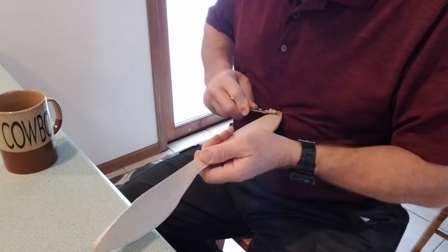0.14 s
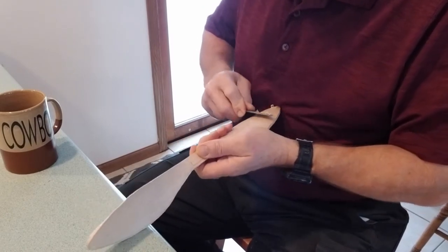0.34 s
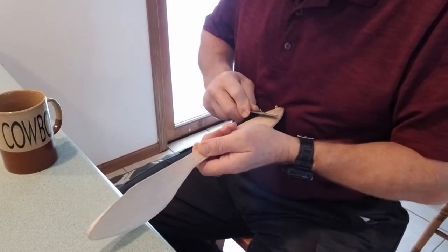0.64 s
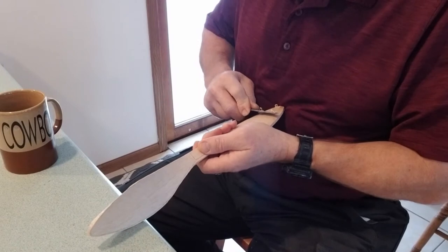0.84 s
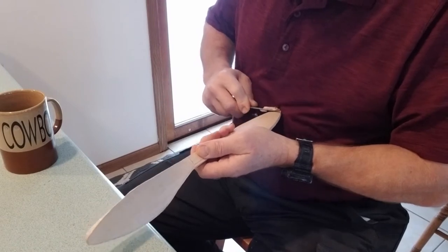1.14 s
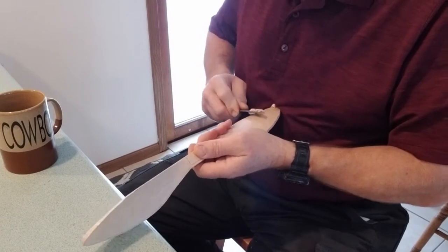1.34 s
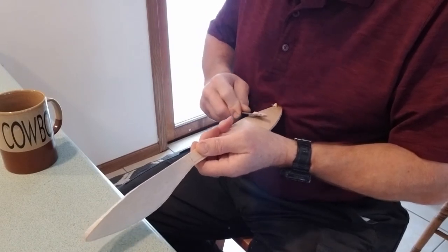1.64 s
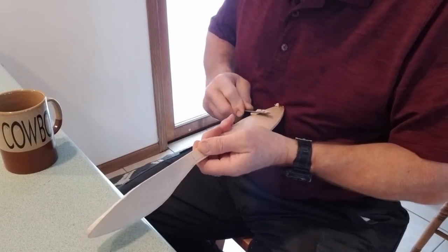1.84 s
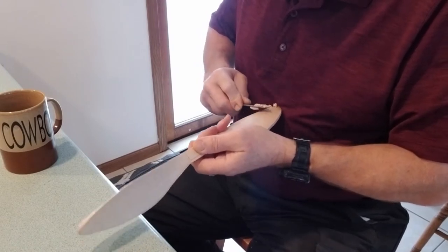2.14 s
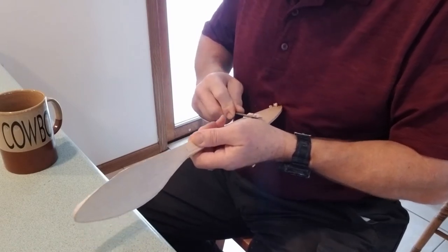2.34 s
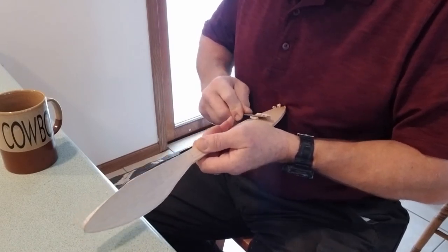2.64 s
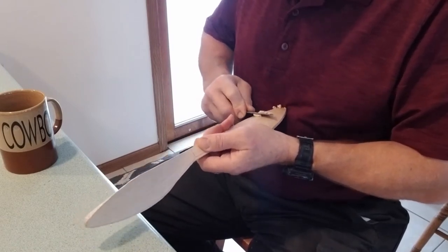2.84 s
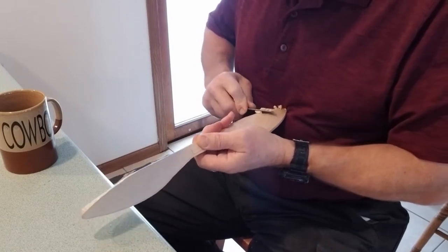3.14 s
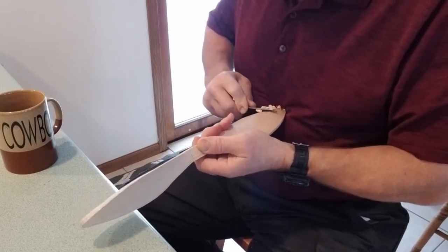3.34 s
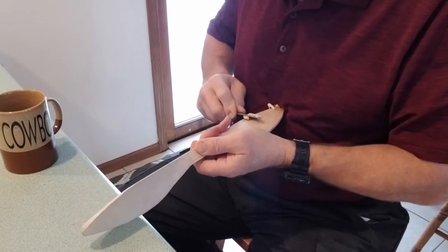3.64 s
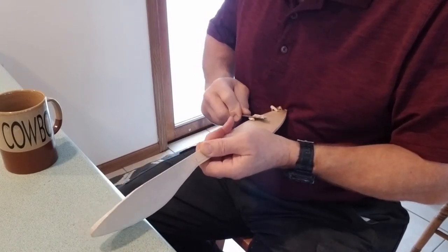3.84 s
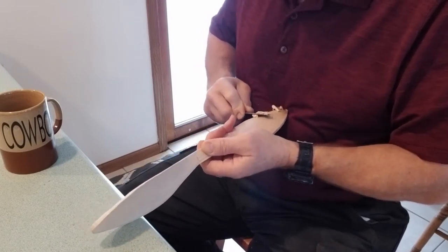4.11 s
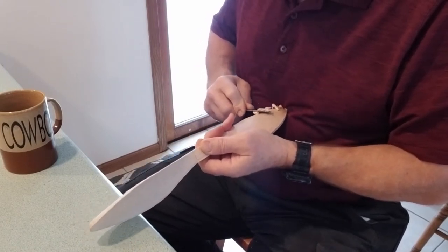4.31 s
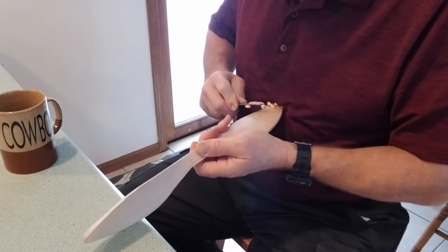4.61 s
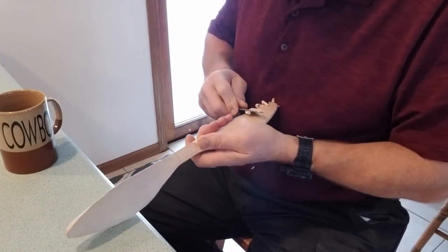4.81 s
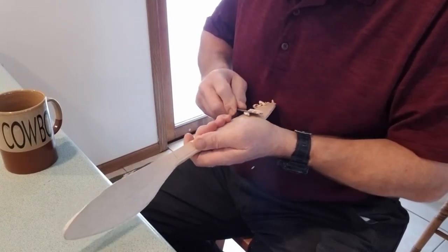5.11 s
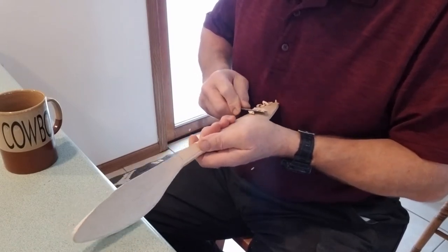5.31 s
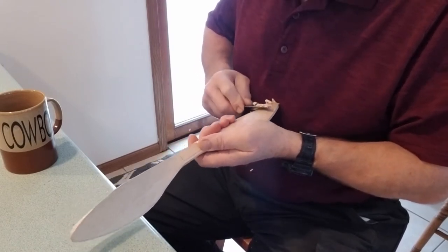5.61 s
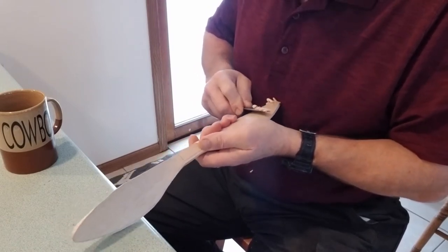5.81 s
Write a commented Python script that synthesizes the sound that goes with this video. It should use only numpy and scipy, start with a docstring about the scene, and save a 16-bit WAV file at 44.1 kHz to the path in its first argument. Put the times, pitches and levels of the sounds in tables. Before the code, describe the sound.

Close up, a knife makes short, dry, raspy cuts in a thin wooden blade, several per second with small gaps. The edge catches and fine fibres snap. The wood's far tip taps the table with hollow, quickly damped knocks, some with a soft low thud. A small hard kitchen adds brief reflections; hush is very faint. The left microphone is brighter and nearer, the right duller and more distant.

```python
"""A small knife shaves a light wooden blade in quick strokes: torn fibres ring the wood, edge and shaving.
The edge slips now and then, and single fibres snap.
The far tip of the blade knocks on the table top: a contact tick, damped modes, a deep ring and a thud.
A hard-walled kitchen answers with early echoes and a diffuse tail, built from sparse random taps.
Behind it lie a quiet hush and a low sway, both shaped noise; the right side is duller and more distant."""
import sys
import numpy as np
from scipy import signal
from scipy.fft import rfft, irfft
from scipy.io import wavfile
from scipy.ndimage import uniform_filter1d

SR = 44100
rng = np.random.default_rng(int(sys.argv[2]) if len(sys.argv) > 2 else 0)


def transcribe(u):
    """Save the signal u as a 16-bit wav file named by the first command-line argument.

    u: samples, shape (n,) or (channels, n), limited to [-1, 1]; the rate is SR.
    q: integer samples, one column per channel.
    """
    v = np.clip(np.atleast_2d(u).T, -1, 1)
    q = np.round(v * 32767).astype(np.int16)
    wavfile.write(sys.argv[1], SR, q)


N = 262836

# All levels are set ahead of the mix; a rel_db is relative to the layer or level that it belongs to.
# One row per cut: start_s, rise_s, hold_s, press_db (edge pressure), bite_rel_db (into the wood),
# fizz_rel_db (curling shaving), rasp_db (wood resonance), wood_hz, edge_hz (resonances)
STROKES = [(0.0, 0.0013, .08, -44, 5.5, -4, 8.5, 1860, 5600),
           (0.15, .02, 0.12, -55, -18, -3.5, 14, 1500, 5370),
           (0.269, 0.012, 0.047, -53.5, 5, 4, -3, 1300, 5270),
           (0.367, 0.035, 0.028, -58, -3, 1, 21, 1300, 6300),
           (0.502, 0.11, 0.014, -51.5, -12, -12.5, 18.5, 1900, 5650),
           (0.712, 0.028, 0.18, -52.5, -4.5, -5, -16, 1680, 5830),
           (0.896, 0.063, 0.068, -47, -12, -7.5, 15.5, 2030, 5230),
           (0.968, 0.069, 0.035, -44.5, 5, -3.5, 13.5, 1780, 5460),
           (1.041, 0.053, 0.057, -50, -18, 0, 11, 1970, 5030),
           (1.346, 0.018, 0.01, -65.5, -2, 15, 30, 1300, 6700),
           (1.379, 0.053, 0.088, -53.5, -5, -2, 7, 1350, 6850),
           (1.665, 0.042, 0.1, -44.5, -2.5, -8, 9.5, 1860, 5260),
           (1.858, .1, 0.04, -41.5, -1, -6, 12, 1710, 5300),
           (2.251, 0.008, 0.01, -59.5, 12, -9, 13, 1340, 5100),
           (2.506, 0.058, 0.076, -55.5, -17, -10, 13, 1600, 4630),
           (2.619, 0.015, 0.028, -51, -3, -7, 17.5, 1600, 4300),
           (2.679, 0.046, 0.048, -48.5, -3, -8, 17.5, 1750, 4070),
           (2.791, 0.032, 0.068, -50.5, -6, -6, 11, 1850, 6360),
           (2.873, 0.088, 0.11, -43, -10.5, -9, 22.5, 1924, 6700),
           (3.183, 0.09, 0.051, -43, 4, -2.5, -13, 1400, 5870),
           (3.453, 0.035, 0.1, -55.5, -15, 0, 13, 1330, 6700),
           (3.658, 0.011, 0.0076, -56.5, -30, 6, 5, 1580, 6760),
           (3.693, 0.082, .03, -51, -5.5, -4.5, 17, 1720, 5300),
           (3.795, 0.014, 0.14, -42.5, 3, -7.5, 6, 1500, 5560),
           (4.04, 0.1, 0.013, -46, -1, -8, 6, 1870, 5250),
           (4.216, 0.066, 0.065, -39.5, 1.5, -5.5, -32, 1340, 5560),
           (4.591, 0.035, 0.051, -43.5, -13, -3, 2, 1720, 5470),
           (4.713, 0.037, 0.023, -50, 6.5, -1, -11, 1260, 6430),
           (4.803, 0.072, 0.074, -52, -15.5, -3, 14, 1330, 6760),
           (5.116, 0.011, 0.24, -57.5, -13, -1.5, 8, 1700, 5350),
           (5.253, 0.056, 0.066, -45, 6.5, -2.5, 8.5, 1900, 5800),
           (5.489, 0.081, 0.032, -53.5, 3.5, 3.5, -31, 1700, 5730),
           (5.546, 0.03, 0.0084, -73.5, -3, 25, 11, 1710, 6100),
           (5.7, 0.023, 0.13, -62, -3, 0.5, 17, 1300, 6100),
           (5.773, 0.14, .1, -50.5, -2.5, -1.5, 14.5, 1730, 5800)]
RISE_DB, SAG_DB_PER_S, LIFT_DB_PER_S = 20, 19.5, 218  # a cut climbs, sags while held, dies as the edge lifts
# The edge catches and drags free: start_s, level_db, swell_ms
SLIPS = [(0.6207, -49, 4.2), (0.9838, -41.5, 4.1), (1.0632, -37.5, 1.7), (1.6934, -43.5, 6),
         (1.788, -42, 3.7), (1.8342, -40.5, 5.4), (1.8937, -43, 6.9), (1.9235, -39.5, 2.8),
         (2.477, -60, 1.8), (3.2078, -39.5, 2.4), (3.2333, -39, 5.1), (4.0816, -44, 9.4), (4.115, -39, 4.7),
         (4.143, -33.5, 3.1), (4.24, -34, 2.7), (4.2752, -40.5, 1.3), (4.295, -37, 2.4), (4.616, -52, 3),
         (4.746, -49, 3.3), (4.9365, -40.5, 2.1), (5.1153, -59, 3.9), (5.2809, -46, 1.8), (5.306, -54, 6),
         (5.335, -53, 4), (5.361, -46, 3.6), (5.5358, -54, 8.6)]
SLIP_BITE_DB, SLIP_FIZZ_DB = -8.5, -2.5  # relative to the bite and fizz of the stroke at that moment
# A single fibre snaps: start_s, level_db, fizz_rel_db, bite_rel_db
SNAPS = [(0.2867, -35, -14, 6), (0.946, -33, 0, -35), (2.9556, -41, -23.5, -10), (3.2607, -34.5, 6, 1),
         (5.3521, -26, 3.5, -2.5), (5.603, -52, 27, -10)]
# Spectrum of torn fibres: freq_hz, rel_db (per Hz)
TEAR_SPECTRUM = [(88, -29), (150, 4), (235, -7), (361, -0.5), (1020, -6.5), (1310, 4), (1720, 0),
                 (2310, -1.5), (2980, 0.5), (3770, -1.5), (6770, -1.5), (8900, -25.5), (13700, -19),
                 (16000, -34.5)]
# Ring of knife and wood: freq_hz, width_hz, rel_db
BODY_RINGS = [(2800, 54, -1), (4430, 540, -3.5), (5036, 250, 2), (6930, 1570, 0.5), (13100, 280, -5),
              (14720, 187, 13)]
# Blade tip on the table: start_s, level_db, contact_ms, deep_rel_db, tick_rel_db, thud_db
KNOCKS = [(0.136, -30, 0.62, -4, 5, -61.5), (0.2841, -30, 0.33, -27, 3.5, -52.5),
          (0.3099, -20.5, 0.27, -4.5, 6, -59), (0.728, -27, 1.55, -6, -6, -82),
          (1.02, -47.5, 0.72, 7, 12.5, -70), (1.3316, -20, 1.13, -6.5, -6, -59),
          (1.586, -62, 0.16, -34, 5, -83), (1.707, -28.5, 0.96, 0.5, -14, -78),
          (2.257, -31.5, 0.64, -41, -5.5, -60), (3.481, -30, 1.5, -6.5, -3, -85),
          (3.8078, -17, 0.3, -4, 6.5, -46), (4.036, -53, 0.42, 3, 17.5, -65),
          (4.753, -17, 1.13, -7.5, -7, -47.5), (4.802, -27, 1.4, -10.5, -15, -86),
          (5.303, -39.5, 1.1, 5, 0, -61), (5.7199, -32.5, 0.79, -5.5, 6.5, -68),
          (5.877, -28.5, 1.45, -2.5, -13, -67.5)]
# Well damped modes of blade and table top: freq_hz, rel_db, t60_s
TABLE_MODES = [(218.5, -1, 0.019), (505, -4.5, 0.034), (623, 1.5, 0.032), (759, 1.5, 0.026),
               (953, 1, 0.032), (1017, 4.5, 0.019), (1232, 10.5, 0.0094), (1463, -8.5, 0.13),
               (1626, 7.5, 0.016), (2006, -5, 0.026), (2730, -35, .03)]
# Close modes that beat, the deep ring: freq_hz, rel_db, t60_s
DEEP_MODES = [(312, 0, .22), (361, -2, .22), (270, -9, .15), (335, -13, .15), (405, -13, .15),
              (130, -21, .2)]
DEEP_DETUNE, DEEP_SWELL_S = .015, .022  # relative spread of pitch from blow to blow; build-up time
# Whole table rocks on its legs: pitch_hz, peak_s (time to the peak)
THUD = (59, .085)
# First echoes off table, wall and ceiling: delay_ms, left_db, right_db
ECHOES = [(3.21, -12, -47), (7.01, -7.5, -6.5), (11.5, -33, -2), (16.11, -42.5, -16), (24.13, -15, -15.5)]
# Decay of the room tail: freq_hz, t60_s
ROOM_DECAY = [(150, 0.31), (500, 0.4), (1400, 0.27), (4000, 0.27), (9000, 0.2), (16000, 0.22)]
# Left-right likeness of room and hush: freq_hz, likeness (0 to 1)
LIKENESS = [(40, 0.62), (150, 0.63), (330, 1), (700, 0.19), (2000, 0.042), (8000, 0.024)]
# Spectrum of the quiet room hush: freq_hz, rel_db (per Hz)
HUSH_SPECTRUM = [(18, -46), (30, -5.5), (68, 4), (280, -12), (721, -16.5), (822, -18), (1540, -15.5),
                 (3140, -23.5), (6720, -14), (7670, -17.5), (8520, -39), (12300, -17.5), (16000, -13)]
HUSH_DB = -61
# Peaks of the low sway as the table shakes: peak_s, level_db
SHAKES = [(0.09, -67), (0.42, -66), (1.46, -56), (2.26, -46.5), (2.85, -60), (3.49, -59), (3.92, -74.5),
          (4.35, -53.5), (4.85, -48), (5.36, -58), (5.78, -53)]
SHAKE_RISE_DB_PER_S, SHAKE_FALL_DB_PER_S, SHAKE_REST_DB = 222, 150., -79
# Tone of the left over the right microphone: freq_hz, rel_db
SHADE = [(60, 5.5), (250, 6.5), (700, 9.5), (1500, 7.5), (3000, 8.5), (5500, 10.5), (7500, 14),
         (9000, -3.5), (11000, -0.5), (13000, 0.5), (16000, 15)]
TOP_LIMIT_HZ = 15950


def knife():
    """Fibre breaks, slips and snaps ring the wood (low), the steel edge (middle) and the shaving (top)."""
    gains, (bite_db, fizz_db, rasp_db, wood_hz, edge_hz) = strokes()
    breaks = fibres(per_s=14000., spread_db=2.0, clump_db=1.5)
    # coarser tearing shakes the wood
    grit = 0.57 * breaks + 0.46 * fibres(per_s=2500., spread_db=3.0, clump_db=3.0)
    drive = np.array([grit, breaks, breaks]) * gains
    add_slips_and_snaps(drive, bite_db, fizz_db)

    hz = np.fft.rfftfreq(N, 1 / SR)
    ringing = sum(gain_of(db) / (1 + 2j * (hz - f) / width) for f, width, db in BODY_RINGS)
    body = gain_of(read(TEAR_SPECTRUM, hz)) * (1 + ringing)
    low = 1 / (1 + (hz / 3010.0) ** 8)
    high = 1 / (1 + (10730.0 / (hz + 1)) ** 12)
    shares = body * np.sqrt([low, (1 - low) * (1 - high), high])
    filters = [evened(abs(share)) * np.exp(1j * np.angle(body)) for share in shares]
    wood, edge, shaving = irfft(rfft(drive) * filters, N)

    wood = band(wood, 191.0, 18500.0)  # a thin blade gives no bass
    wood = 0.62 * (wood + gain_of(rasp_db) * resonate(wood, wood_hz, 200.0))
    edge = 0.48 * (edge + 1.05 * resonate(edge, edge_hz, 880.0))
    return patchy_pair(wood + edge + shaving, patchy_db=2.5, turns=0.66)


def strokes():
    """Gains of wood, edge and shaving; the colour leans towards whichever cut presses hardest."""
    start, rise, hold, press_db, bite_db, fizz_db, *tone = np.transpose(STROKES)[:, :, None]
    coarse = np.arange(0, N / SR + .002, .002)
    t = np.arange(N) / SR
    since = coarse - start - rise  # seconds since the top of the rise
    climb_db = RISE_DB * since / np.maximum(rise, .002)
    sag_db = -SAG_DB_PER_S * np.minimum(since, hold)
    lift_db = -LIFT_DB_PER_S * np.maximum(since - hold, 0)
    shape_db = np.where(since < 0, climb_db, sag_db + lift_db)
    power = gain_of(2 * np.maximum(press_db + shape_db, -150))
    gains = [np.sqrt((power * gain_of(2 * db)).sum(0)) for db in (bite_db, 0, fizz_db)]
    colours = [(power * c).sum(0) / power.sum(0) for c in [bite_db, fizz_db] + tone]
    return [np.interp(t, coarse, g) for g in gains], [np.interp(t, coarse, c) for c in colours]


def fibres(per_s, spread_db, clump_db):
    """Tiny breaks of uneven size that come in clumps of a few milliseconds."""
    size = gain_of(spread_db * np.minimum(rng.exponential(1, N), 5))
    size = size * (rng.random(N) < per_s / SR)
    clumps = evened(uniform_filter1d(uniform_filter1d(rng.standard_normal(N), 250), 250))
    return evened(size * rng.choice([-1., 1.], N) * gain_of(clump_db * clumps))


def add_slips_and_snaps(drive, bite_db, fizz_db):
    """A slip is a swelling noise burst, a snap a far shorter one; both drive wood, edge and shaving."""
    ms = np.arange(1500) / SR * 1000
    bursts = []
    for at, db, swell_ms in SLIPS:
        i = round(at * SR)
        burst = ms / swell_ms * np.exp(1 - ms / swell_ms) * rng.standard_normal(len(ms))
        bursts.append((at, db, fizz_db[i] + SLIP_FIZZ_DB, bite_db[i] + SLIP_BITE_DB, burst))
    for row in SNAPS:
        bursts.append((*row, 2.0 * np.exp(-ms / 0.17) * rng.choice([-1., 1.], len(ms))))
    for at, db, fizz, bite, burst in bursts:
        for part, rel_db in zip(drive, (bite, 0, fizz)):
            add(part, at, gain_of(db + rel_db) * burst)


def patchy_pair(x, patchy_db, turns):
    """Colour shifts in random patches of pitch and time; random phase makes the right unlike the left."""
    z = signal.stft(x, nperseg=256, noverlap=192)[2]
    chance = rng.standard_normal((2,) + z.shape)
    smooth = uniform_filter1d(uniform_filter1d(chance, 4, 1), 30, 2)  # across pitch, then time
    patches, scatter = (evened(p) for p in smooth)
    left = z * gain_of(patchy_db * patches)
    right = left * np.exp(2j * np.pi * turns * scatter)
    return signal.istft([left, right], nperseg=256, noverlap=192)[1][:, :N]


def knocks():
    """A rounded push, duller the longer the contact, strikes damped wood; deep ring and thud swell after it."""
    out, low = np.zeros(N), np.zeros(N)
    t = np.arange(SR // 2) / SR
    thud_hz, thud_peak_s = THUD
    deep_swell = 1 - np.exp(-(t / DEEP_SWELL_S) ** 2)
    thud_swell = (t / thud_peak_s * np.exp(1 - t / thud_peak_s)) ** 3
    for at, db, contact_ms, deep_db, tick_db, thud_db in KNOCKS:
        u = t[:400] * 6000 / max(contact_ms, .1)
        push = u ** 2 * np.exp(-u)
        dent = np.convolve(push, push)  # the contact itself is heard, rounder than the push
        top = 0.56 * rings(TABLE_MODES, t, scatter_db=2.5)
        add(out, at, gain_of(db) * signal.oaconvolve(top, push / push.sum()))
        add(out, at, -gain_of(db + tick_db) * dent / dent.max())
        # the pitch of the deep ring varies a little at random from blow to blow
        deep = rings(DEEP_MODES, t * rng.normal(1, DEEP_DETUNE), scatter_db=3.5)
        add(low, at, gain_of(db + deep_db) * deep_swell * deep)
        add(low, at, gain_of(thud_db) * thud_swell * np.sin(2 * np.pi * thud_hz * t))
    return band(out, 223.0, 5500.0), low  # the thin blade radiates no bass


def rings(modes, t, scatter_db):
    """Dying modes of alternate sign; each one's share varies at random from blow to blow."""
    total = 0
    for k, (hz, db, t60) in enumerate(modes):
        level_db = db + scatter_db * rng.standard_normal() - 60 * t / t60
        total = total + (-1) ** k * gain_of(level_db) * np.sin(2 * np.pi * hz * t)
    return total


def room(x):
    """A few first echoes, then sparse ones of random sign, each band dying at its own speed."""
    taps = np.zeros((2, SR))
    slots = np.arange(130, SR - 20, 20)
    at = slots + rng.integers(0, 20, (2, len(slots)))
    np.put_along_axis(taps, at, rng.choice([-1., 1.], at.shape), 1)
    hz, t, z = signal.stft(taps, SR, nperseg=256)
    decay = gain_of(-60 * t / read(ROOM_DECAY, hz)[:, None])
    tail = pair(*signal.istft(z * decay, SR, nperseg=256)[1])
    tail *= 1 - np.exp(-np.arange(tail.shape[1]) / SR / 0.024)  # the diffuse sound takes time to gather
    tail /= np.linalg.norm(tail[0])
    for ms, *db in ECHOES:
        tail[:, round(ms * SR / 1000)] += gain_of(db)
    return signal.fftconvolve(x, tail, axes=1)[:, :N]


def pair(a, b):
    """Left and right from two unrelated signals, most alike in the low bands."""
    n = a.shape[-1]
    same = np.clip(read(LIKENESS, np.fft.rfftfreq(n, 1 / SR)), -1, 1)
    right = irfft(same * rfft(a) + np.sqrt(1 - same ** 2) * rfft(b), n)
    return np.array([a, right])


def background():
    """Quiet room hush, and a slow sway at the bottom that swells with each shake."""
    hush = gain_of(HUSH_DB) * evened(colour(pair(*rng.standard_normal((2, N))), HUSH_SPECTRUM))
    t = np.arange(N) / SR
    level_db = np.full(N, SHAKE_REST_DB)
    for at, db in SHAKES:
        slope_db = np.minimum(SHAKE_RISE_DB_PER_S * (t - at), SHAKE_FALL_DB_PER_S * (at - t))
        level_db = np.maximum(level_db, db + slope_db)
    sway = gain_of(level_db) * evened(band(rng.standard_normal(N), 16.0, 50.0))
    return hush + sway


def gain_of(db):
    """Decibels to amplitude."""
    return 10 ** (np.asarray(db) / 20)


def evened(x):
    """Scales to rms 1."""
    return x / np.sqrt(np.mean(x ** 2) + 1e-20)


def read(points, hz):
    """Value of a spectrum table on a log-frequency axis."""
    f, value = np.transpose(points)
    return np.interp(np.log(hz + 1), np.log(f + 1), value)


def colour(x, points):
    """Filters by a dB spectrum."""
    return irfft(rfft(x) * gain_of(read(points, np.fft.rfftfreq(N, 1 / SR))), N)


def band(x, lo_hz, hi_hz):
    """Band-pass."""
    edges = [lo_hz, min(hi_hz, SR / 2.2)]
    return signal.sosfilt(signal.butter(3, edges, "bandpass", fs=SR, output="sos"), x)


def resonate(x, hz, width):
    """Shifts the curve hz down to zero, smooths, and shifts back: a resonance of gain 1."""
    turn = np.exp(2j * np.pi * np.cumsum(hz * np.ones(len(x))) / SR)
    r = np.exp(-np.pi * width / SR)
    return 2 * (turn * signal.lfilter([1 - r], [1, -r], x / turn + 1e-18)).real


def add(mix, s, sound):
    """Mixes a sound in at time s."""
    part = mix[round(s * SR):][:len(sound)]
    part += sound[:len(part)]


def scene():
    """The right microphone faces away: it hears less straight sound and more room."""
    cut = knife()
    knock, deep = knocks()
    straight = (cut + gain_of(-1.54) * knock) * gain_of([[0.], [-5.]])
    send = gain_of(-8.5) * cut + gain_of(-3.5) * knock + gain_of(-17.0) * deep
    wet = room(send) * gain_of([[0.], [1.5]])
    return straight + wet + deep + background()


def record(dry):
    """The right microphone is shaded, which recolours it; then a steep low-pass limits both."""
    left = gain_of(1.5) * dry[0]
    right = gain_of(2.0) * colour(dry[1], [(hz, -db) for hz, db in SHADE])
    lowpass = signal.firwin(511, TOP_LIMIT_HZ, window=("kaiser", 9), fs=SR)
    return signal.oaconvolve(np.array([left, right]), lowpass[None], "same")


dry = scene()
out = record(dry)
transcribe(out)
```